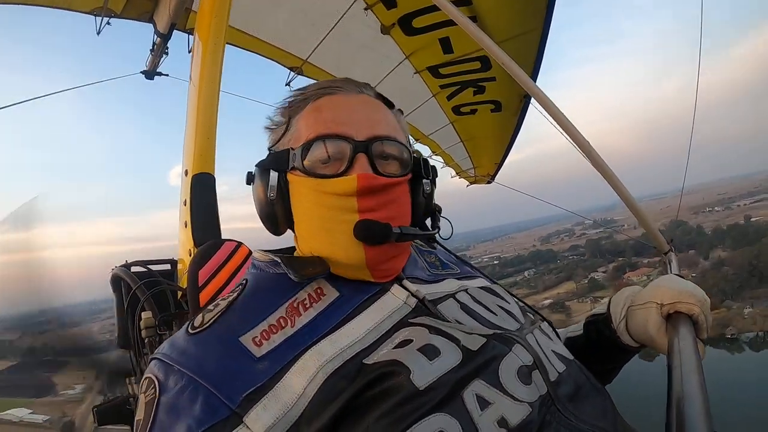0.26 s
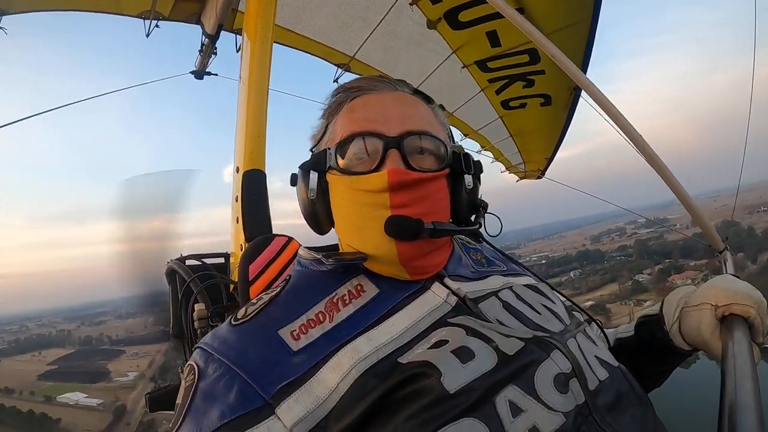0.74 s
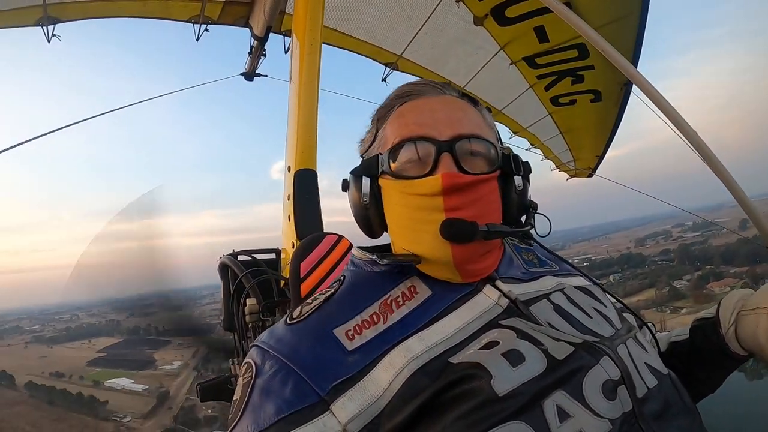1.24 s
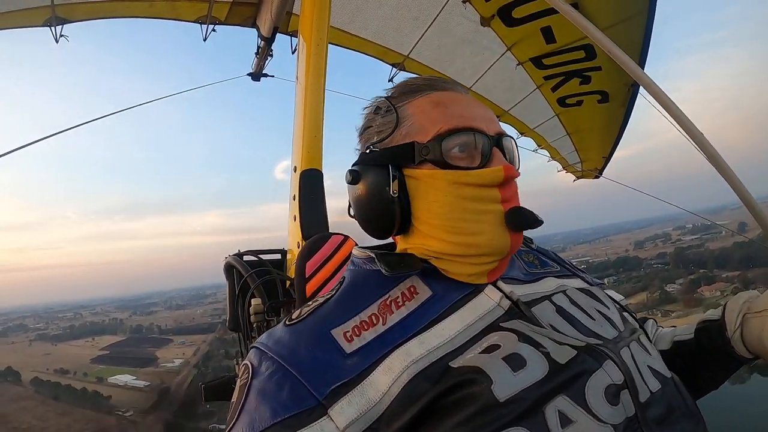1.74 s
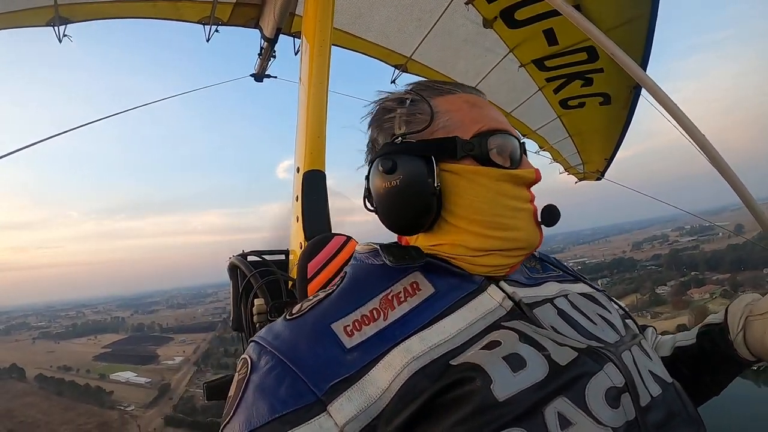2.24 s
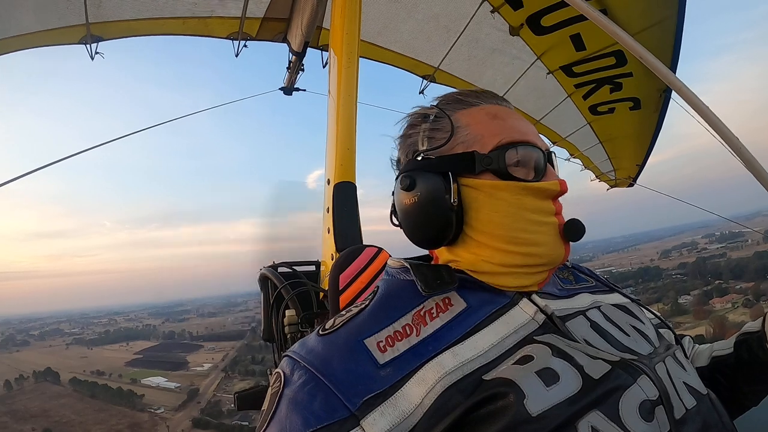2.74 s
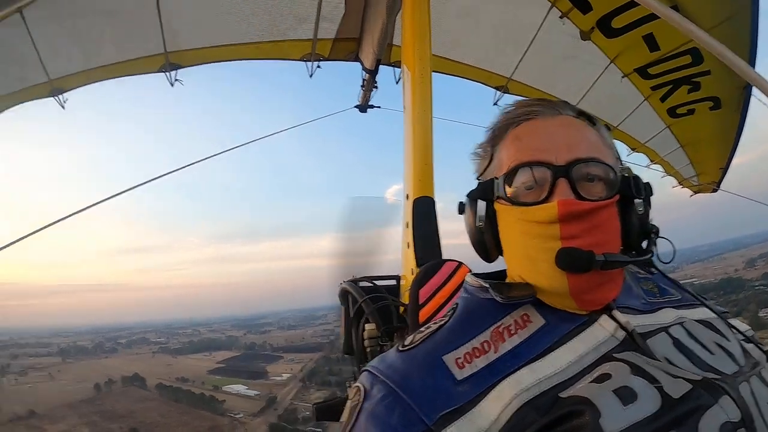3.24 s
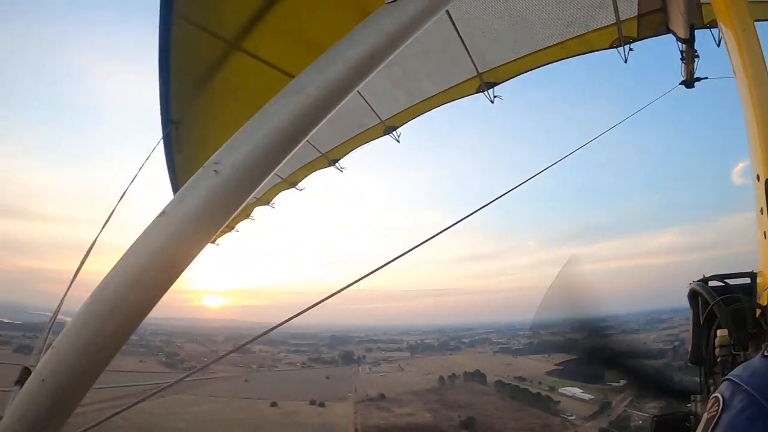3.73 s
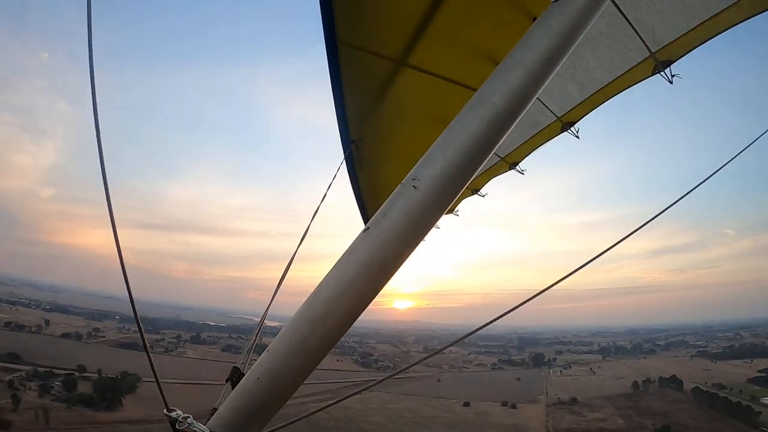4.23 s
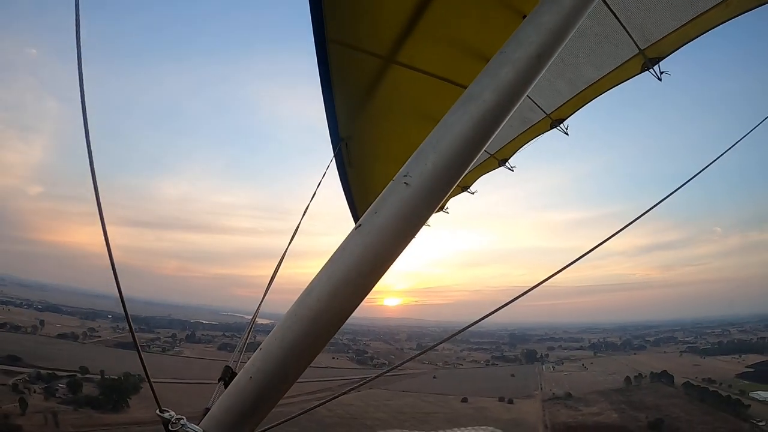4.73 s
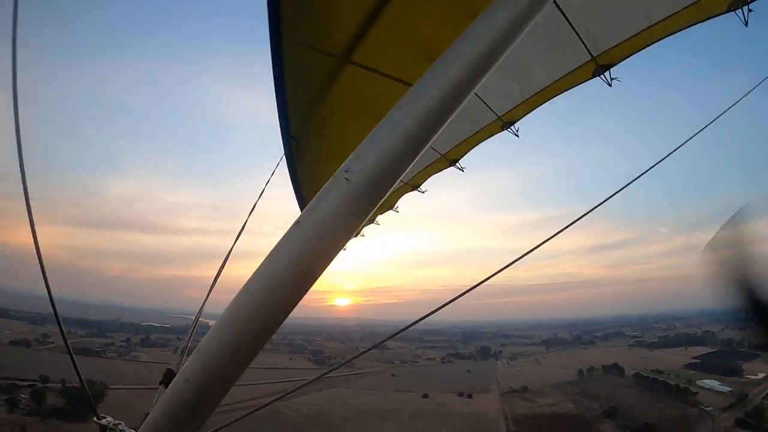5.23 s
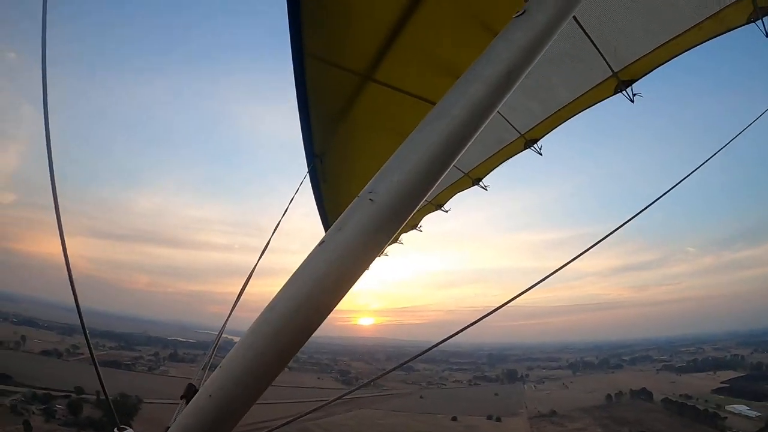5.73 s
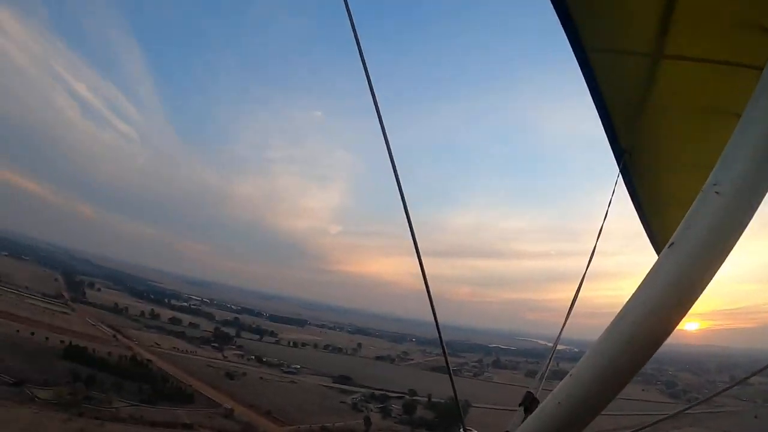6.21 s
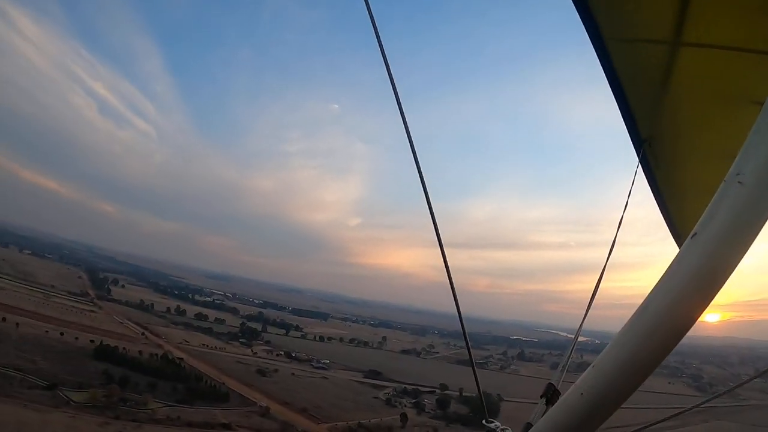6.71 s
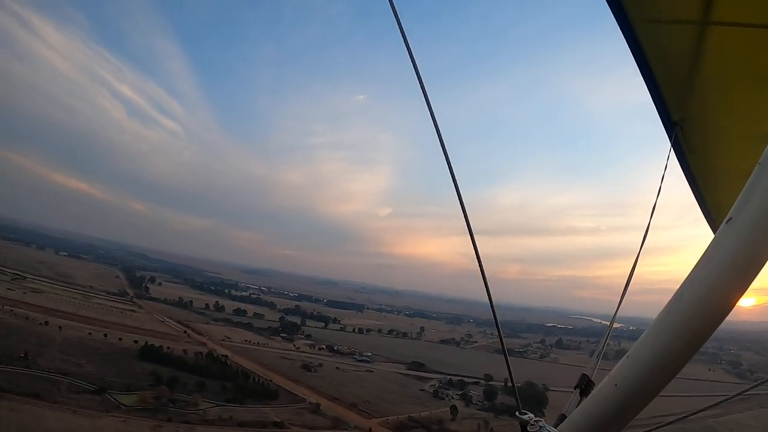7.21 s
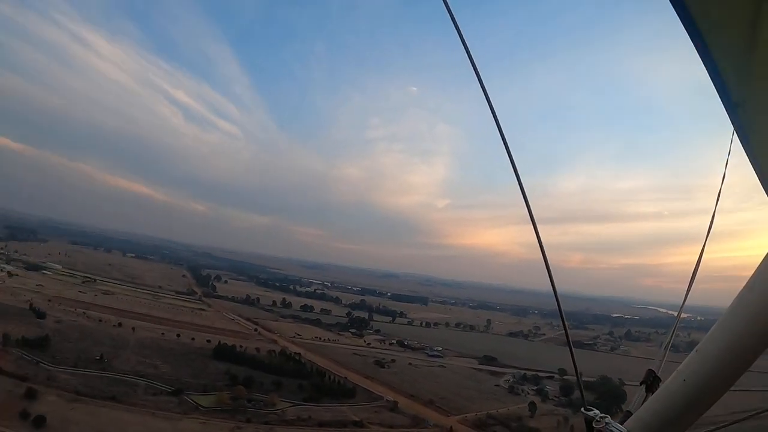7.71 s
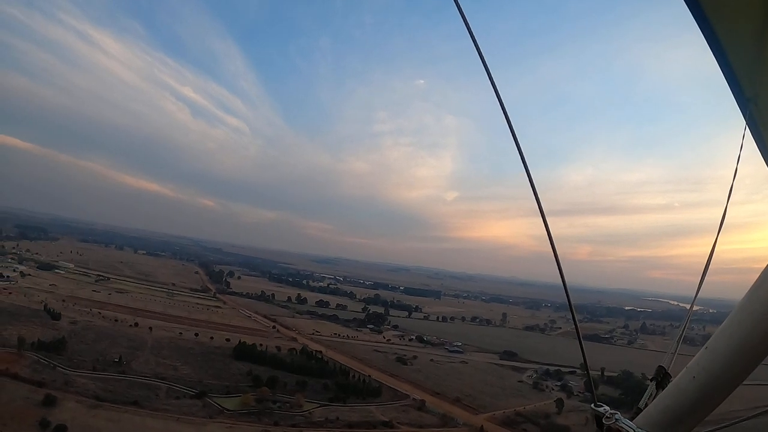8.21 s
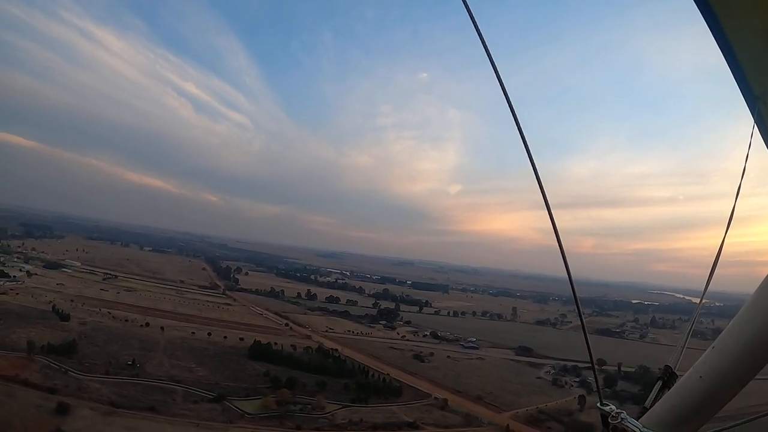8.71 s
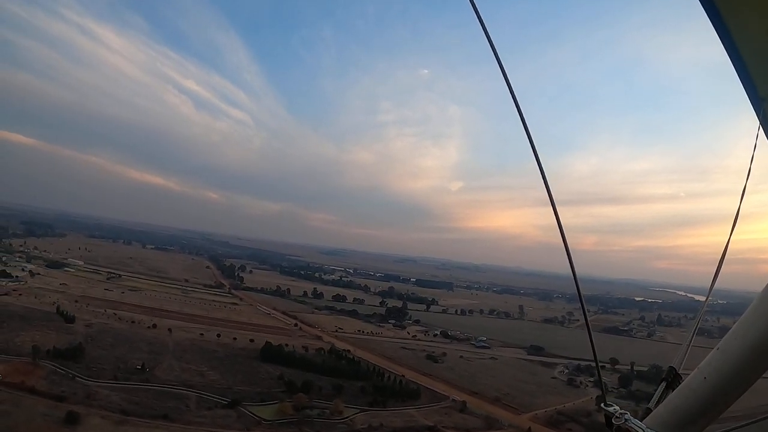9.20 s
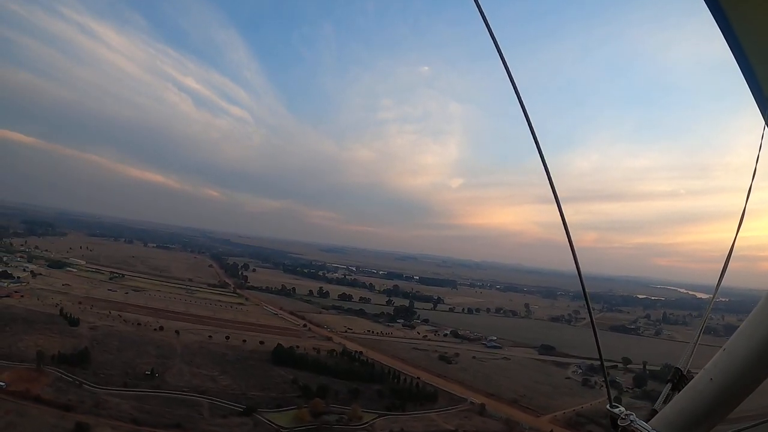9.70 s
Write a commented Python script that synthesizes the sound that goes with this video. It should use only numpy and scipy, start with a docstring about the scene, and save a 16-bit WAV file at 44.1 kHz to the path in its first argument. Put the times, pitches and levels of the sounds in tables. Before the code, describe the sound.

A low two-stroke engine and propeller drone runs throughout under throbbing wind at the microphone, with light ticks and one hard gust midway.

```python
"""A low two-stroke drone runs throughout under throbbing air: a microlight trike cruises, its engine easing off.
The twin behind the seat, a sum of exhaust harmonics, drives a geared three-blade pusher: rough blade lines.
A hand-held microphone in the slipstream swings from facing the engine to facing away. Coloured noise and a
stumbling throb make the air round it, gliding sines its whistles, excited resonances the ticks of something
loose and of handling, and pushes with short roars the gusts and knocks. One hard gust makes the limiter duck."""
import sys
import numpy as np
from scipy import signal
from scipy.fft import rfft, irfft, next_fast_len
from scipy.io import wavfile

SR = 44100
rng = np.random.default_rng(int(sys.argv[2]) if len(sys.argv) > 2 else 0)


def inscribe(sig):
    """Save sig as 16-bit PCM at rate SR to the path in sys.argv[1].

    A 1-D sig is mono; a 2-D sig holds one channel per row.
    Samples are clipped to [-1, 1] before scaling.
    """
    pcm = np.round(np.clip(np.atleast_2d(sig).T, -1, 1) * 32767)
    wavfile.write(sys.argv[1], SR, pcm.astype(np.int16))


N = 438794
TIME = np.arange(N) / SR

# the swing of the microphone: [time_s, heading (0 towards engine, 1 side-on, 2 half away, 3 straight ahead)]
HEADING = [(0, 0), (1.9, 0), (3.1, 0.15), (3.8, 0.52), (4.45, 1), (5.3, 0.44), (6.2, 2.1), (8.0, 2),
           (8.8, 3)]
# the air at each heading: [heading, rumble_db, throb_db, eddy_rate_hz, rush_db, wash_db, hiss_db,
# hiss_brightness_db, cavity_resonance_db]
AIR_BY_HEADING = [(0, -19, -15, 166.9, -27.5, -29.5, 2.5, 1.5, -1.5),
                  (1, -14, -12.5, 153, -28, -27.5, 1.5, 1.5, 1.5),
                  (2, -14.5, -14, 153.9, -26.5, -26.5, 5, -3.5, -2.5),
                  (3, -15.7, -14.5, 152.8, -25.5, -27.5, 2.5, -0.5, -3)]
# level of the treble, added to the hiss level: [time_s, level_db]
TREBLE_LEVEL = [(0.0, -43), (1.36, -43), (1.72, -41.5), (6.57, -43), (6.71, -44.5), (9.15, -44.5),
                (9.64, -48), (9.95, -49)]
# broad swells in the slipstream, added to the air levels:
# [centre_s, half_width_s, rumble_db, rush_db, wash_db, cavity_resonance_db]
SLIPSTREAM_SWELLS = [(0.248, 0.37, -1.5, 0.5, 3, 0.5), (2.1, 1, 3.5, 0.5, 1.8, -0.5),
                     (3.29, 0.2, -3, 2, 2, -1), (3.9, .25, -1, 1.5, 1.5, 2.5), (4.402, .15, 0, 0.5, 1, 4.5),
                     (5.15, 0.19, 1.5, 2, 1, 2), (5.947, 0.31, 1, 0, -1, 3), (6.38, .22, 0, 0.5, 0.5, 0),
                     (8.077, 0.25, 1, 4, 0.5, 0)]

# spectral shapes of the rumble on the port, the rushing air, the propeller wash and the hiss: [pitch_hz, shape_db]
RUMBLE_SPECTRUM = [(8, -12.5), (20, -20), (32, -3), (50, -1.5), (60, 2.5), (75, 2), (118, 4), (150, 7.5),
                   (195, -21), (230, -5.5), (260, -12.5), (310, -15), (450, -24.5)]
RUSH_SPECTRUM = [(180, -24), (300, -14), (370, -2), (440, 5), (480, 2), (530, -1.5), (600, 2.5),
                 (700, -3.5), (770, -1.5), (830, -10), (1000, -16.5), (1500, -42)]
WASH_SPECTRUM = [(650, -21.5), (880, -7), (1000, -4.5), (1120, 2.5), (1220, -2), (1320, -7), (1450, -6.5),
                 (1570, -5.5), (1700, -11), (1850, -15.5), (2100, -29), (3000, -34.5)]
HISS_SPECTRUM = [(1400, -18.5), (1900, 4.5), (2200, -2), (2500, 0), (3100, 1), (3450, -6.5), (3900, -8),
                 (4550, -9.5), (5500, -11.5), (6200, -15.5), (6550, -17.5), (6800, -17), (9500, -20.5),
                 (15500, -30.5)]
# short roar of a gust or knock: [pitch_hz, shape_db]
ROAR_SPECTRUM = [(30, 21.5), (300, 0.5), (600, -6), (1500, -19.5), (3000, -27.0), (7000, -55)]
# cavities of the housing, before the cavity resonance level: [pitch_hz, width_hz, gain_db]
HOUSING_CAVITIES = [(3270, 380, -16), (4185, 200, 7), (4820, 140, 1), (5330, 46, 0.5), (6830, 130, -11),
                    (12200, 990, 3.5)]

# strongest surges of the eddy throb: [centre_s, half_width_s, rise_db]
THROB_SURGES = [(0.566, 0.032, 8), (1.865, 0.14, 5), (4.534, 0.044, 3), (5.187, 0.034, 7.5),
                (8.493, 0.09, 9), (9.457, 0.077, 9.5)]
# moments when the eddy shedding stalls: [centre_s, half_width_s]
SHEDDING_STALLS = [(1.555, 0.069), (2.608, 0.048), (2.815, 0.034), (3.207, 0.03), (4.736, 0.04),
                   (5.38, 0.15), (6.644, 0.027), (8.814, 0.022), (9.317, .06)]
# gusts and handling knocks on the housing: [centre_s, half_width_s, push_db, roar_db]
GUSTS_AND_KNOCKS = [(5.279, .008, -23, -12), (5.296, 0.04, -19, -7), (5.354, 0.012, -22, -29),
                    (5.369, 0.0034, -11, -2), (5.378, 0.0023, 7, -11), (7.619, 0.0044, -26, -5)]
# air whistling over an edge: [start_s, length_s, start_hz, end_hz, level_db]
EDGE_WHISTLES = [(3.48, .15, 11600, 12400, -47), (3.65, 0.11, 12400, 11500, -50),
                 (3.78, 0.15, 7130, 7050, -46.5), (3.98, 0.077, 5330, 5350, -44),
                 (4.424, 0.13, 7050, 7030, -51), (5.313, 0.044, 4770, 5100, -40),
                 (5.419, 0.054, 5470, 4930, -46), (5.978, 0.035, 5300, 5150, -40),
                 (6.012, 0.048, 4930, 4830, -36.5)]

# something loose flicks against the housing; the last two are handling knocks:
# [start_s, peak_db before a common lift]
TICKS = [(2.011, -20), (2.071, -16), (2.0763, -10.5), (2.1, -34), (2.1492, -17), (2.172, -24), (2.231, -15),
         (2.306, -12.5), (2.3573, -17), (2.526, -12), (2.558, -20), (3.287, -28), (3.363, -22),
         (3.502, -20.5), (3.850, -17), (3.860, -18), (5.278, -22), (5.37, -20)]
# what each tick sets ringing: [pitch_hz, level_db within the tick, t60_s]
TICK_MODES = [(1420, 5, 0.024), (1910, -6.5, 0.0027), (2560, -0.5, 0.026), (3080, 3, 0.015),
              (3660, -1.5, .005), (4380, -5, 0.02), (6500, -14, 0.0019)]

# crankshaft speed, easing off a little: [time_s, turns_per_s]
CRANK_SPEED = [(0, 100.12), (0.9, 99.85), (1.5, 100.04), (2.1, 99.82), (2.8, 99.8), (3.6, 98.93),
               (4.4, 98.53), (6.0, 98.26), (8.0, 98.1), (9.95, 98.12)]
# propeller lines: [multiple of blade rate, level_db]
BLADE_LINES = [(1, -25), (2, -39), (3, -37), (4, -41), (5, -57), (7, -46)]
# exhaust lines, before a common lift:
# [multiple of crank speed, towards_db, side_on_db, half_away_db, straight_ahead_db]
EXHAUST_LINES = [(1, -13, -28, -18, -14.5), (2, -39.5, -33.5, -26, -30.5), (3, -34.5, -30.5, -26, -27),
                 (4, -32, -31.5, -34.5, -43), (5, -51.5, -42, -42.5, -49.5), (6, -44, -47, -50.5, -36),
                 (7, -59.5, -46, -41.5, -40.5), (8, -41, -38.5, -37, -37), (9, -49.5, -52.5, -51.5, -53),
                 (10, -56.5, -49.5, -42, -43.5), (11, -50.5, -45, -44, -43.5),
                 (14, -48.5, -54.5, -51.5, -64), (16, -51.5, -48.5, -43.5, -44.5),
                 (18, -53, -51.5, -49.5, -55), (19, -52.5, -59.5, -63, -67)]

BLADES_PER_TURN = 3 / 3.47  # three blades through the reduction gear, per crank turn
THROB_SWING_DB, THROB_SWINGS_PER_S, STALL_DB = 3.5, 11.5, -14.5
WASH_FOLLOWS = 0.54  # share of the treble's swing that the wash takes
BRIGHT_HZ = 5000  # the hiss grows brighter or duller above this
# the edge of the housing sings faintly round one slanting heading
SING_HEADING, SING_SPREAD, SING_HZ, SING_WANDER_HZ, SING_DB = 1.4, 0.42, 5360, 158, -52
# dry crack of each tick: level against the ringing, and band
CRACK_DB, CRACK_LOW_HZ, CRACK_HIGH_HZ = 30.5, 1000, 4000
# the recorder's steep treble drop above the first; nearly nothing passes above the second
DULL_ABOVE_HZ, CUTOFF_HZ = 7200, 15700


def from_db(db):
    """Decibels to gain."""
    return 10 ** (np.asarray(db) / 20)


def rms_one(x):
    """Scale to rms 1."""
    return x / np.sqrt(np.mean(x ** 2) + 1e-20)


def in_time(rows):
    """Each column of a timed curve, at every sample."""
    s, *columns = np.transpose(rows)
    return [np.interp(TIME, s, column) for column in columns]


def facing(levels):
    """A quantity given for each heading, at every sample of the swing."""
    heading, = in_time(HEADING)
    return np.interp(heading, np.arange(len(levels)), levels)


def bump(s, half_width):
    """A bell-shaped swell of height 1."""
    return np.exp(-np.minimum(((TIME - s) / half_width) ** 2, 50))


def drift(rate_hz):
    """Slow random wandering of rms 1: twice-smoothed noise, made at every 40th sample."""
    r = np.exp(-2 * np.pi * rate_hz * 40 / SR)
    white = rng.standard_normal(N // 40 + 2002)
    slow = signal.lfilter([1], [1, -2 * r, r * r], white)[2000:]  # drop the filter's settling
    return np.interp(np.arange(N) / 40, np.arange(len(slow)), rms_one(slow))


def noise(spectrum):
    """Noise of a given colour, rms 1, falling away beyond the ends of its spectrum."""
    hz, db = np.transpose(spectrum)
    size = next_fast_len(N)
    f = np.arange(size // 2 + 1) * SR / size + 1e-3
    skirts = np.minimum(f / hz[0], 1) ** 2 * np.minimum(hz[-1] / f, 1) ** 2
    gain = from_db(np.interp(np.log(f), np.log(hz), db)) * skirts
    return rms_one(irfft(rfft(rng.standard_normal(size)) * gain, size)[:N])


def butter(x, hz, kind, order=2):
    """Causal low- or high-pass."""
    return signal.sosfilt(signal.butter(order, hz, kind, fs=SR, output="sos"), x)


def resonate(x, hz, width_hz):
    """A resonance with gain 1 at its top."""
    r = np.exp(-np.pi * width_hz / SR)
    top = np.array([1, 0, -1]) * (1 - r * r) / 2
    return signal.lfilter(top, [1, -2 * r * np.cos(2 * np.pi * hz / SR), r * r], x)


def ring(clicks, hz, t60):
    """A unit click sets a decaying sine of initial height 1 ringing."""
    r = from_db(-60 / (t60 * SR))
    w = 2 * np.pi * hz / SR
    return signal.lfilter([0, np.sin(w)], [1, -2 * r * np.cos(w), r * r], clicks + 1e-18)


def line(angle, flutter_db, smear):
    """One partial heard through turbulent air, which shakes its level and phase (smear in radians)."""
    phase = angle + rng.uniform(0, 2 * np.pi) + smear * drift(2.3)
    return np.sqrt(2) * np.sin(phase) * from_db(flutter_db * drift(3.8))


def buffet(level_db, hz, width_hz, steadiness):
    """Eddies peel off almost regularly: a narrow, stumbling throb that surges and stalls."""
    db = level_db + THROB_SWING_DB * drift(THROB_SWINGS_PER_S)
    db = db + sum(rise_db * bump(s, half_width) for s, half_width, rise_db in THROB_SURGES)
    db = db + STALL_DB * sum(bump(s, half_width) for s, half_width in SHEDDING_STALLS)
    # a slow complex wobble spreads the eddy rate into a narrow band
    wobble = butter(rng.standard_normal(N) + 1j * rng.standard_normal(N), width_hz, "low")
    wobble = wobble / np.sqrt(np.mean(abs(wobble) ** 2))
    wobble = wobble / np.sqrt(1 + steadiness * abs(wobble) ** 2)  # an eddy can only grow so large
    shedding = np.exp(2j * np.pi * np.cumsum(hz) / SR)
    return from_db(db) * rms_one(np.real(wobble * shedding))


def hiss(brightness_db, cavity_db):
    """Air slides over the housing as coloured noise and excites the resonances of its cavities."""
    air = noise(HISS_SPECTRUM)
    edge = (from_db(brightness_db) - 1) * butter(air, BRIGHT_HZ, "high", order=1)
    hollow = sum(from_db(db) * resonate(air, hz, width) for hz, width, db in HOUSING_CAVITIES)
    return air + edge + from_db(cavity_db) * hollow


def air_now():
    """The columns of the air table as the microphone swings."""
    return [facing(column) for column in np.transpose(AIR_BY_HEADING)[1:]]


def airflow(crank, blade):
    """Rumble on the port, throbbing eddies, rush, hiss, and a wash that pulses with exhaust and blades."""
    rumble_db, throb_db, eddy_hz, rush_db, wash_db, hiss_db, brightness_db, cavity_db = air_now()
    treble_db, = in_time(TREBLE_LEVEL)
    for s, half_width, more_rumble_db, more_rush_db, more_wash_db, more_cavity_db in SLIPSTREAM_SWELLS:
        swell = bump(s, half_width)
        rumble_db = rumble_db + more_rumble_db * swell
        rush_db = rush_db + more_rush_db * swell
        wash_db = wash_db + more_wash_db * swell
        cavity_db = cavity_db + more_cavity_db * swell
    wash_db = wash_db + WASH_FOLLOWS * (treble_db - treble_db.mean())
    pulsing = 1 + 0.04 * np.cos(crank) + 0.14 * np.cos(2 * crank) + 0.087 * np.cos(blade)
    turbulence = drift(28)  # shared by rush, wash and hiss
    rumble = from_db(rumble_db) * noise(RUMBLE_SPECTRUM)
    throb = buffet(throb_db, eddy_hz, width_hz=10.6, steadiness=0.63)
    rush = from_db(rush_db + 1.2 * turbulence) * noise(RUSH_SPECTRUM)
    wash = from_db(wash_db + 0.25 * turbulence + 0.5 * drift(22)) * noise(WASH_SPECTRUM) * pulsing
    treble = from_db(treble_db + hiss_db + 0.5 * turbulence) * hiss(brightness_db, cavity_db)
    return rumble + throb + rush + wash + treble


def gusts_and_knocks():
    """Gusts and handling knocks on the housing: a push and a short roar."""
    roar = noise(ROAR_SPECTRUM)
    return sum(bump(s, half_width) * (from_db(push_db) + from_db(roar_db) * roar)
               for s, half_width, push_db, roar_db in GUSTS_AND_KNOCKS)


def singing_edge():
    """A thin tone of wandering pitch and level, strongest when air meets the housing edge at a slant."""
    heading, = in_time(HEADING)
    slant = np.exp(-((heading - SING_HEADING) / SING_SPREAD) ** 2)
    level = slant * from_db(SING_DB + 4 * drift(14))
    hz = SING_HZ + SING_WANDER_HZ * drift(6) + 60 * drift(120)
    return level * np.sin(2 * np.pi * np.cumsum(hz) / SR)


def whistles(waver_hz):
    """Brief wavering edge tones that glide as the angle of the flow changes."""
    hz, level = np.zeros(N), np.zeros(N)
    for s, length, start_hz, end_hz, db in EDGE_WHISTLES:
        inside = (TIME > s) & (TIME < s + length)
        part = (TIME[inside] - s) / length
        hz[inside] = start_hz + (end_hz - start_hz) * part
        level[inside] = from_db(db) * np.sin(np.pi * part)
    wavering_hz = hz + waver_hz * (drift(120) + drift(20))
    return level * from_db(1.2 * drift(80)) * np.sin(2 * np.pi * np.cumsum(wavering_hz) / SR)


def ticks(contact_s=0.0032):
    """Each flick or knock is a dry crack and a short gritty contact that rings the housing."""
    after = np.arange(SR // 30) / SR
    contact = after / contact_s * np.exp(-(2 * after / contact_s) ** 2)
    grit = contact * rng.standard_normal((len(TICKS), len(TICK_MODES), len(after)))
    rings = sum(from_db(db) * ring(grit[:, k], hz, t60) for k, (hz, db, t60) in enumerate(TICK_MODES))
    snap = signal.unit_impulse(len(after), int(np.argmax(contact)))  # at the height of the contact
    snap = butter(snap, CRACK_LOW_HZ, "high")
    crack = from_db(CRACK_DB) * butter(snap, CRACK_HIGH_HZ, "low", order=6)
    out = np.zeros(N + len(after))
    for (s, db), tick in zip(TICKS, rings + crack):
        start = int(s * SR)
        out[start:start + len(after)] += from_db(db + 4) * tick / abs(tick).max()
    return out[:N]


def propeller(blade):
    """Blades chop the wake of the trike, so their lines are rough."""
    return sum(from_db(db) * line(multiple * blade, flutter_db=2.5, smear=0.44)
               for multiple, db in BLADE_LINES)


def engine(crank):
    """Exhaust harmonics; pilot and housing shade each one differently as the microphone turns."""
    out = 0
    for k, *levels_db in EXHAUST_LINES:
        partial = line(k * crank, flutter_db=0.85 * k ** 0.41, smear=0.085 * k ** 0.53)
        out = out + facing(from_db(levels_db)) * partial
    return from_db(1.5) * out


def scene():
    """Air, knocks, ticks, propeller and engine, all at one microphone."""
    speed, = in_time(CRANK_SPEED)
    crank = 2 * np.pi * np.cumsum(speed) / SR
    blade = BLADES_PER_TURN * crank
    air = airflow(crank, blade) + singing_edge() + whistles(waver_hz=73.2)
    return (air + gusts_and_knocks() + ticks() + propeller(blade) + engine(crank))[None]


def limiter(x, ceiling_db, release_db_per_s, attack_hz):
    """Peaks over the ceiling pull the gain down; it climbs back steadily."""
    over = np.maximum(20 * np.log10(abs(x) + 1e-9) - ceiling_db, 0)
    release = release_db_per_s * TIME
    held = np.maximum.accumulate(over + release, axis=-1) - release
    return x * from_db(-butter(held, attack_hz, "low", order=1))


def record(dry):
    """One limiter catches gusts, a second evens out the buffeting bass; the recorder dulls the high treble."""
    held = limiter(dry, ceiling_db=1.0, release_db_per_s=101.5, attack_hz=250)
    bass = butter(butter(held, 280, "low"), 280, "low")
    rest = butter(butter(held, 280, "high"), 280, "high")
    bass = limiter(bass * from_db(0.8), ceiling_db=-9.0, release_db_per_s=172.5, attack_hz=219)
    held = butter(bass + rest * from_db(-2.02), 24, "high")
    dulled = signal.sosfilt(signal.ellip(8, 0.3, 60, DULL_ABOVE_HZ, fs=SR, output="sos"), held)
    dulled = dulled + from_db(-20.5) * held  # a trace of the high treble gets through
    dulled = dulled * np.minimum((TIME[-1] - TIME) / 0.004, 1)  # 4 ms fade at the end
    return signal.sosfilt(signal.ellip(8, 0.3, 70, CUTOFF_HZ, fs=SR, output="sos"), dulled)


dry = scene()
out = record(dry)
inscribe(out)
```